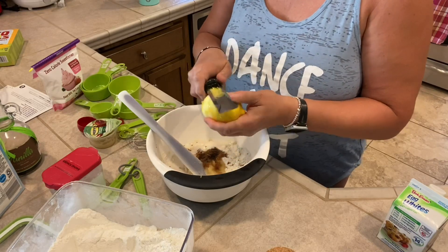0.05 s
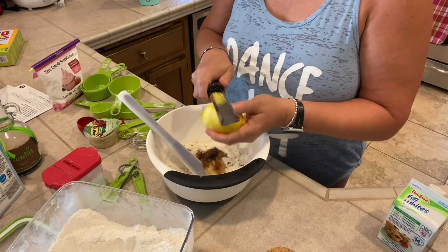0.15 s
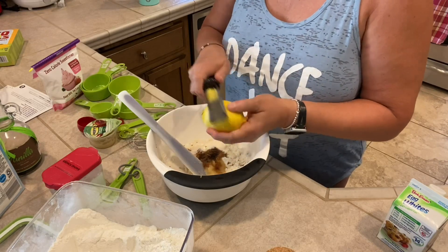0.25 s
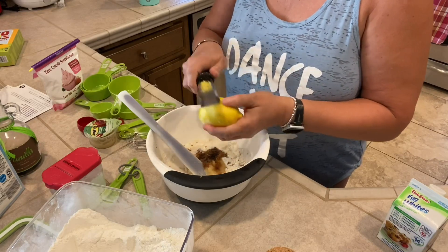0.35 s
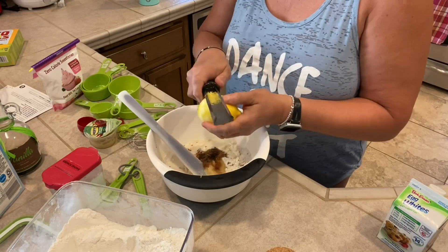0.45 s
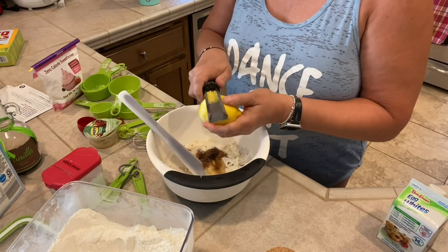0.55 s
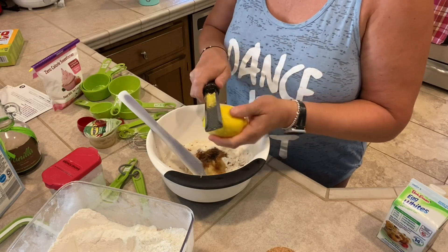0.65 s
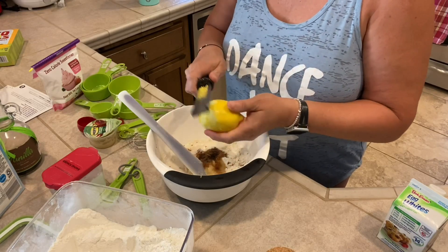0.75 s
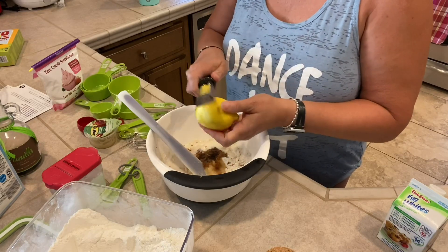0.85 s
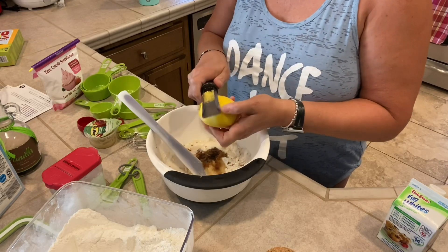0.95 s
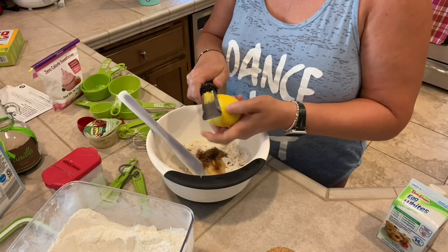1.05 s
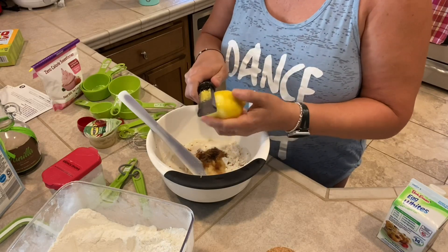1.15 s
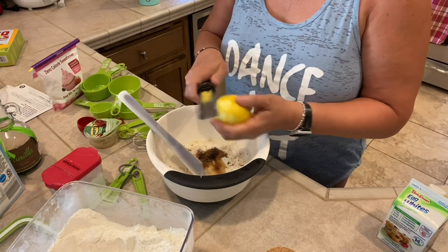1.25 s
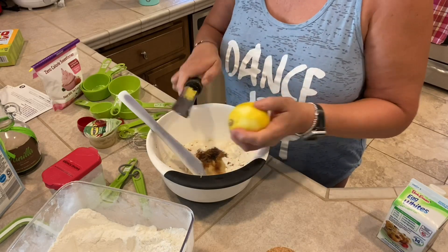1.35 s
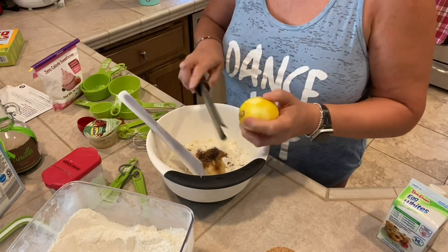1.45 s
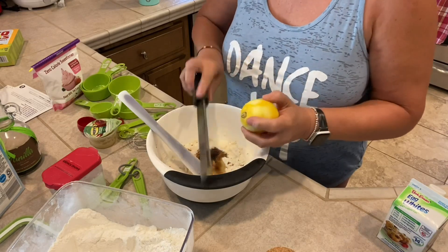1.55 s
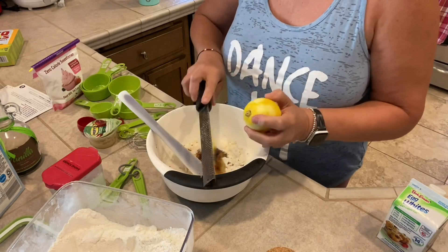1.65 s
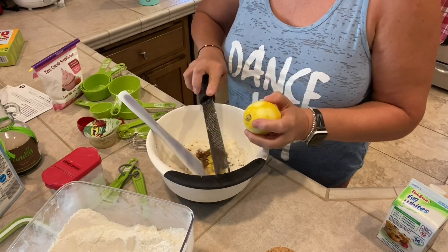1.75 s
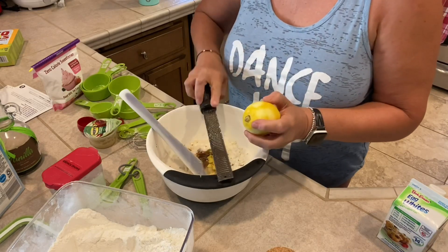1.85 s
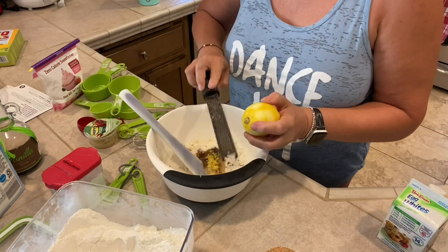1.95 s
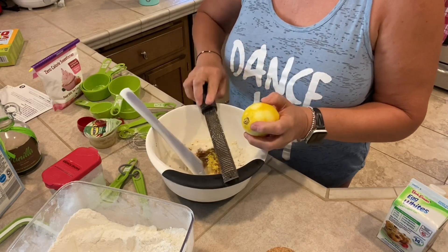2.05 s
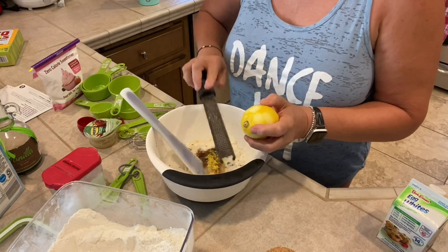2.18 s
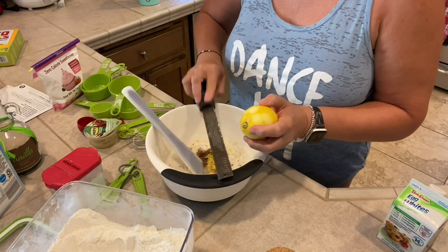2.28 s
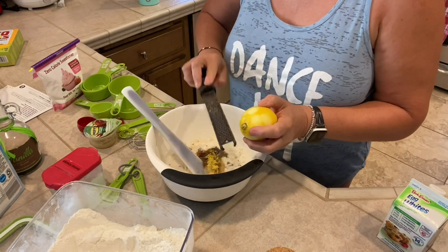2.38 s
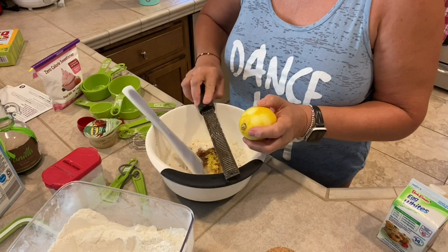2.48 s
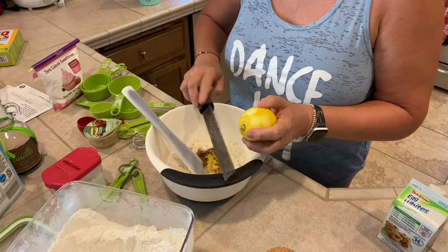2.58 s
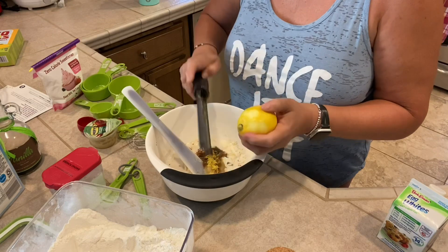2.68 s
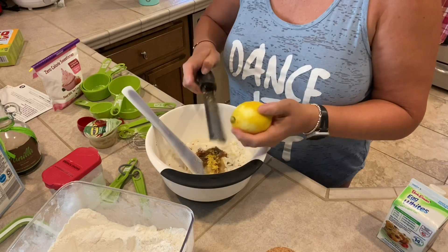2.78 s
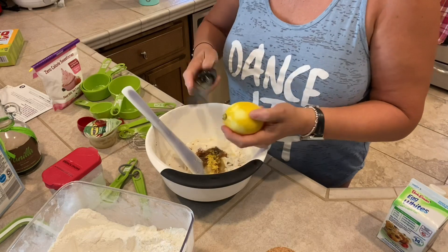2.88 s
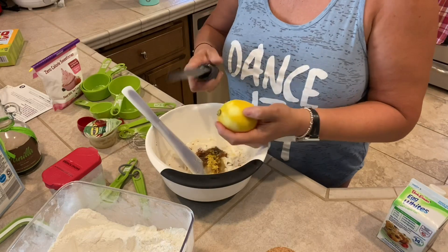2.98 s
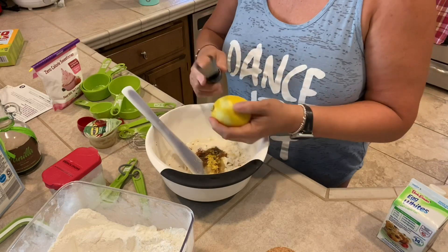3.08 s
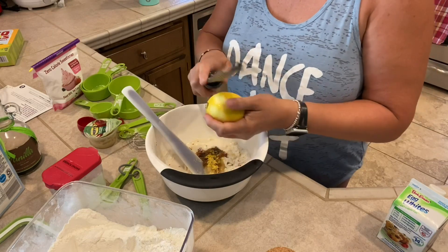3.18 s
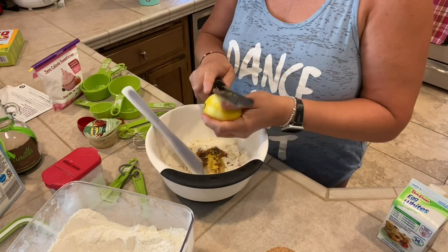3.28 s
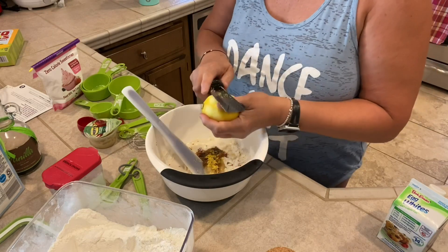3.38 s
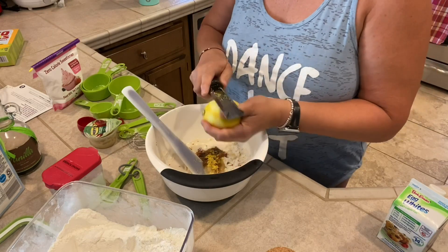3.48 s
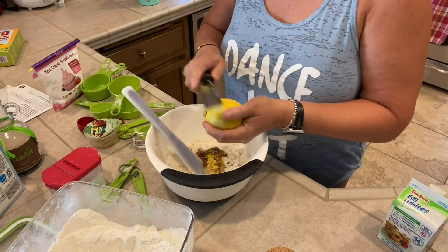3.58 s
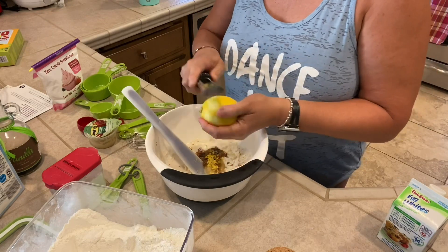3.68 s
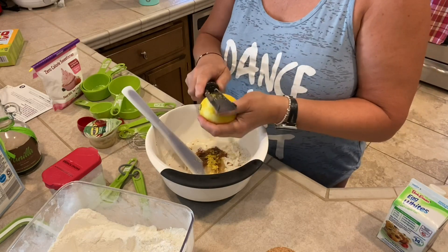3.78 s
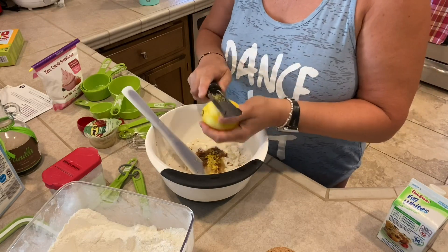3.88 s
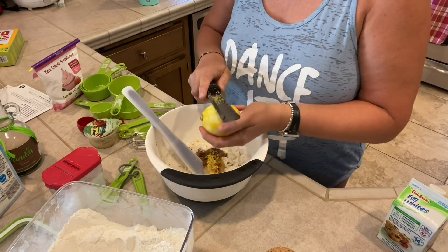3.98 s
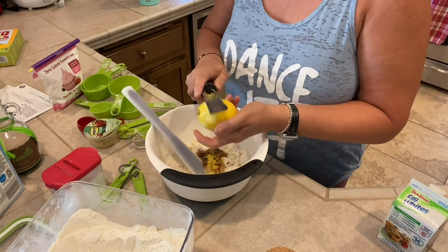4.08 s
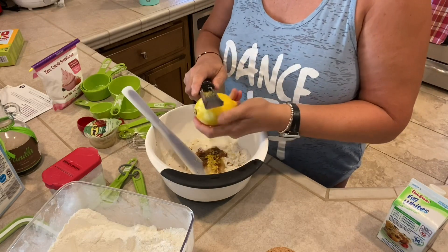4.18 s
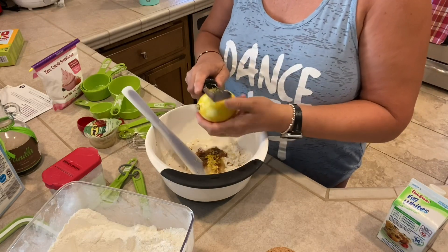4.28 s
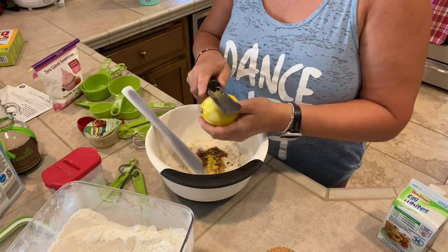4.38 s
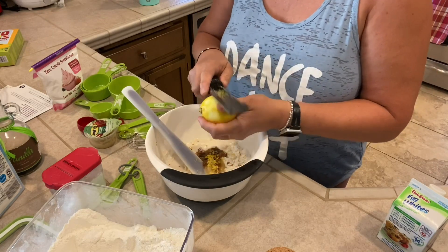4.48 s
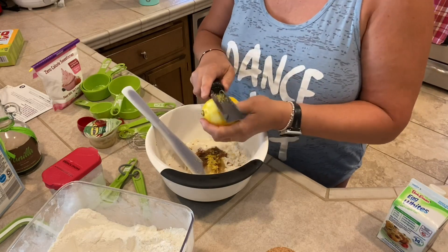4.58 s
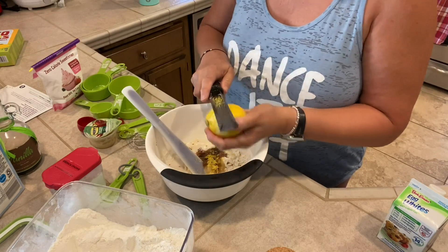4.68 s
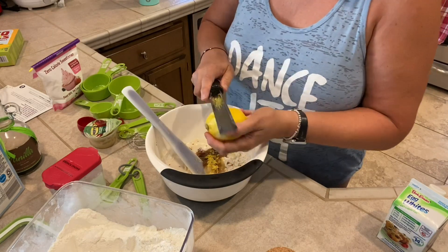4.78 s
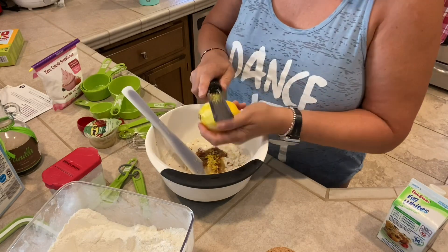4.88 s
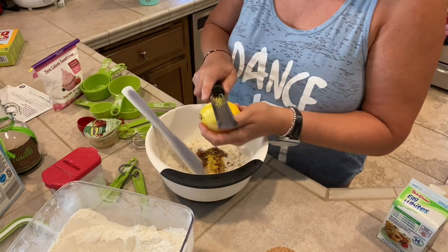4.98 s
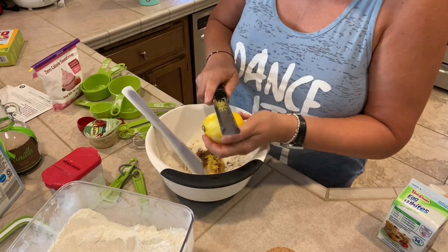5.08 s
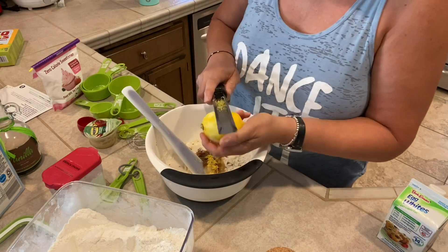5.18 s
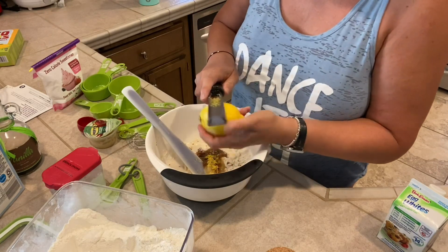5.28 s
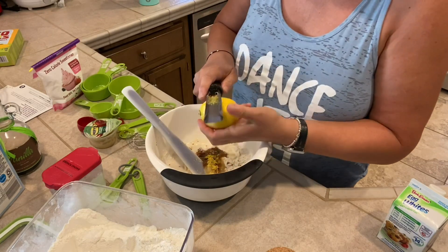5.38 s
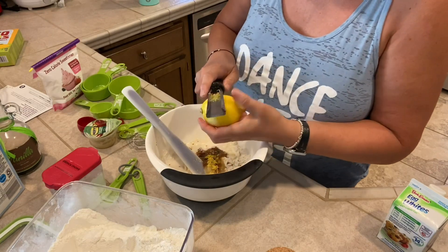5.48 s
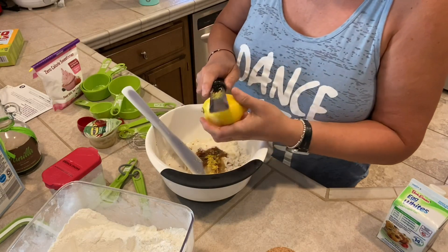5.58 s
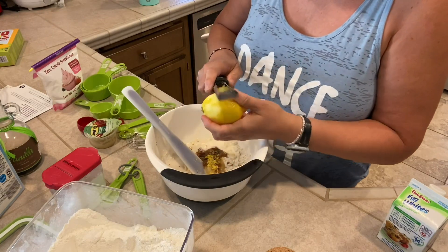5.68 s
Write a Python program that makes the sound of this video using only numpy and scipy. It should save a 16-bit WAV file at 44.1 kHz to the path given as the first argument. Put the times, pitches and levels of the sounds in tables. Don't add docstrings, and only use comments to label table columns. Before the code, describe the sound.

Close stereo pickup in a tiled kitchen: two quiet, gritty rasps of lemon peel on a fine grater, small handling ticks, then five loud knocks of the steel blade against a plastic bowl, hollow and briefly echoing. Fingers rub the fruit, and four more soft scrapes follow over a low refrigerator hum.

```python
import sys
import numpy as np
from scipy import signal
from scipy.fft import rfft, irfft
from scipy.io import wavfile

SR = 44100
rng = np.random.default_rng(int(sys.argv[2]) if len(sys.argv) > 2 else 0)


def store_wav(level_fs):
    pcm = np.round(np.clip(np.atleast_2d(level_fs), -1, 1) * 32767)
    wavfile.write(sys.argv[1], SR, pcm.T.astype(np.int16))


def rack_gain(trim_db):
    fader = np.asarray(trim_db, float)
    return 10 ** (fader / 20)


N = 253414


def rms_one(x):
    return x / np.sqrt(np.mean(x ** 2) + 1e-20)


def at_hz(points, hz):
    points = np.array(points)
    return np.interp(np.log(hz), np.log(points[:, 0]), points[:, 1])


def drift(rate):
    r = np.exp(-80 * np.pi * rate / SR)
    noise = rng.standard_normal(N // 40 + 2002)
    slow = signal.lfilter([1], [1, -2 * r, r * r], noise)[2000:]
    return np.interp(np.arange(N) / 40, np.arange(len(slow)), rms_one(slow))


def peak(x, hz, width):
    r = np.exp(-np.pi * width / SR)
    poles = [1, -2 * r * np.cos(2 * np.pi * hz / SR), r * r]
    return signal.lfilter([(1 - r * r) / 2, 0, (r * r - 1) / 2], poles, x)


def colour(x, spectrum):
    hz = np.maximum(np.fft.rfftfreq(N, 1 / SR), 1)
    return rms_one(irfft(rfft(x) * rack_gain(at_hz(spectrum, hz)), N))


def grains(per_s, spread_db):
    sizes = rack_gain(spread_db * np.minimum(rng.exponential(1, N), 4)) * rng.choice([-1, 1], N)
    return sizes * (rng.random(N) < per_s / SR)


def motion(rows, column, law):
    t, power = np.arange(0, N / SR, .001), 0
    for row in rows:
        turn = np.interp(t, np.cumsum(row[:3]), [0, np.pi / 2, np.pi])
        power = power + (rack_gain(row[column]) * np.abs(np.sin(turn)) ** law) ** 2
    return np.interp(np.arange(N) / SR, t, np.sqrt(power))


# start in seconds, speeding up in seconds, slowing down in seconds,
# cut level in dB at full speed.
STROKES = [
    (-.01, 0.13, 0.076, -54.5),
    (.445, 0.12, 0.11, -51),
    (3.345, 0.079, 0.11, -54.5),
    (3.752, 0.077, .14, -51.5),
    (4.485, 0.14, 0.1, -52),
    (4.915, .1, 0.076, -52),
]
# start in seconds, speeding up in seconds,
# slowing down in seconds, hiss in dB, cut in dB.
GLIDES = [(.384, 0.0047, 0.048, -86.5, -69), (.87, 0.047, 0.12, -80, -74.5),
          (1.14, 0.058, 0.066, -79.5, -71), (1.275, 0.021, 0.019, -61.5, -65), (1.31, .04, 0.08, -75, -77),
          (1.37, .1, 0.14, -73, -81), (2.68, .16, .05, -70.5, -77.5), (2.92, 0.079, .08, -82, -80.5),
          (3.03, 0.059, 0.15, -81, -80.5), (3.5, 0.037, 0.021, -80.5, -73.5),
          (4.055, 0.019, 0.075, -78, -77.5), (4.27, 0.117, .1, -82, -82.5), (4.855, 0.028, .03, -81, -85),
          (5.18, 0.11, 0.051, -71, -69.5), (5.465, 0.0078, 0.027, -85, -97.5),
          (3.22, .012, 0.045, -92.5, -77), (5.48, 0.039, .15, -100, -82.5)]
# start in seconds, speeding up in seconds,
# slowing down in seconds, fingers in dB, palm in dB.
GRIPS = [(.2, 0.064, 0.16, -69, -51.5), (.384, 0.0044, 0.061, -66, -61), (.75, 0.05, 0.28, -97, -62),
         (1.12, 0.082, 0.17, -78, -57.5), (1.45, 0.12, 0.039, -57, -61), (2.95, 0.18, .15, -96, -67),
         (3.54, 0.065, 0.09, -98, -64.5), (4.0, 0.11, .14, -97, -72), (4.28, 0.049, 0.22, -63, -60.5),
         (5.2, 0.11, 0.13, -74, -63), (5.36, 0.15, 0.26, -67, -64)]
# frequency in Hz, density in dB per Hz.
PEEL = [(290, -40.5), (500, -21), (1020, -15.5), (1440, -1.5), (1840, -5.5), (3870, 4), (5770, -6.5),
        (8300, -7), (10800, -25), (18300, -120)]
# frequency in Hz, width in Hz, lift in dB.
BLADE = [(1555, 200, 3.5), (2834, 250, 6), (3500, 500, 3.5), (3740, 210, 2.5), (7960, 610, -3.5)]
# frequency in Hz, density in dB per Hz.
HISS = [(3000, -26.5), (6000, -6), (9000, -2.5), (13000, -4), (16500, -7.5)]
RUB = [(400, -18.5), (800, -2), (1400, 2), (2000, -3), (2600, -4), (3200, -28.5), (8000, -68)]
PALM = [(200, -27.5), (400, 8), (900, -2.5), (1300, -26), (2500, -38.5)]


def zesting():
    cut_gain = motion(STROKES, -1, law=1.57) + motion(GLIDES, -1, law=1.7)
    hiss_gain = rack_gain(-5.5) * motion(STROKES, -1, law=2.2) + motion(GLIDES, -2, law=1.7)
    rub_gain = rack_gain(-0.1) * motion(STROKES, -1, law=2.8) + motion(GRIPS, -2, law=2.4)
    palm_gain = rack_gain(-13) * motion(STROKES, -1, law=1.6) + motion(GRIPS, -1, law=2.4)

    teeth = grains(7000, spread_db=3.5)
    skin = grains(5000, spread_db=2.5)
    uneven = drift(40)
    ringing = sum((rack_gain(db) - 1) * peak(teeth, hz, width) for hz, width, db in BLADE)
    cut = colour(teeth + ringing, PEEL) * cut_gain * rack_gain(-0.5 + 0.37 * uneven)
    hiss = colour(teeth, HISS) * hiss_gain * rack_gain(3.0 + 0.72 * uneven)
    rub = colour(skin, RUB) * rub_gain * rack_gain(-5.5)
    palm = colour(skin, PALM) * palm_gain * rack_gain(-7.5)
    return cut + hiss + rub + palm


# frequency in Hz, density in dB per Hz.
CLATTER = [(150, -23), (500, 0), (1500, -5), (3000, -13.5), (6000, -19.5), (16000, -32.5)]


def struck(hits, modes, late_turns, late_s, held_s, spread_db, crack_s, clatter_s):
    body, cracks, clatters = np.zeros((3, N))
    t = np.arange(5000) / SR
    hz, mode_db, t60 = np.transpose(modes)[:, :, None]
    since = np.maximum(t - late_s - late_turns / hz, 0)
    swell = (1 - np.exp(-since * hz / 0.45)) * rack_gain(-60 * since / t60)
    damped = 1 / (1 + np.exp(np.minimum((t - held_s) / 0.0011, 50)))
    ringing = damped * swell * np.sin(2 * np.pi * hz * since)
    signs = (-1) ** np.arange(len(hz))[:, None]
    crack_fade = np.exp(-t[:3000] / crack_s)
    clatter_shape = (1 - np.exp(-t / 0.00017)) * np.exp(-t / clatter_s)
    rattle = colour(grains(5400, spread_db=7.5), CLATTER)
    for s, db, weight_db, crack_db, clatter_db in hits:
        i = round(s * SR)
        snap = rng.standard_normal(3000)
        uneven_db = spread_db * rng.standard_normal((len(hz), 1))
        tilt_db = -weight_db * np.log2(hz / 500)
        strength = signs * rack_gain(mode_db + tilt_db - 3.5 + uneven_db)
        body[i:i + 5000] += rack_gain(db) * np.sum(strength * ringing, axis=0)
        cracks[i:i + 3000] += rack_gain(db + crack_db) * crack_fade * snap
        clatters[i:i + 5000] += rack_gain(db + clatter_db) * clatter_shape * rattle[i:i + 5000]
    rumble_cut = signal.butter(2, 90, "high", fs=SR, output="sos")
    return signal.sosfilt(rumble_cut, [body, cracks, clatters])


# start in seconds, strength in dB, weight in the lows in dB per octave,
# crack in dB, clatter in dB.
TOUCHES = [
    (1.5295, -9, 9, -27.5, -21.5),
    (1.7695, -12.5, 2, -30.5, -21.5),
    (1.9665, -10.5, -1.5, -32, -13.5),
    (2.190, -11.5, 7.5, -21, -15),
    (2.3985, -8.5, 4, -30.5, -16.5),
]
# frequency in Hz, level in dB, t60 in seconds.
RIM = [(191, -12.5, 0.067), (313, -12.5, 0.027), (447, -11.5, 0.025), (562.7, -3, 0.021),
       (642, -9.5, 0.024), (1148, -1, 0.072), (1204, -12, 0.025), (1759, -15, 0.035), (2360, -13, 0.0087),
       (8750, -33.5, .008)]


def rim_touches():
    return struck(TOUCHES, RIM, late_turns=0.5, late_s=.0012, held_s=0.012, spread_db=4.05,
                  crack_s=.002, clatter_s=0.026)


# start in seconds, strength in dB, weight in the lows in dB per octave,
# crack in dB, clatter in dB.
SLAPS = [
    (1.785, -7.5, 3.5, -8.5, -18),
    (1.9743, -2.5, 3.4, -11.5, -21),
    (2.205, -8.5, 5, -9.5, -30.5),
    (2.4072, -0.5, 2.8, -17, -25.5),
]
# frequency in Hz, level in dB, t60 in seconds.
BOWL = [(147.4, -5, 0.055), (248, -5.5, 0.057), (383.5, -1.5, 0.17), (507, -10, 0.22), (600, -9, 0.048),
        (710, -14, 0.041), (816, -19, 0.056), (941, -15, 0.087), (1090, -14.5, 0.019), (2309, -9.5, 0.0091)]


def bowl_slaps():
    return struck(SLAPS, BOWL, late_turns=0.39, late_s=0.00037, held_s=0.014, spread_db=0.65,
                  crack_s=0.00036, clatter_s=0.014)


# start in seconds, peak in dB, centre in Hz, fade in ms.
TICKS = [(0.3865, -47.5, 1422, 1.9), (.449, -57, 6000, 1.04), (.858, -57.5, 12630, 0.73),
         (.882, -57, 12180, 0.87), (1.186, -59, 3500, 1.7), (1.203, -61, 5200, 1), (1.216, -52, 5100, 1.2),
         (1.276, -61, 12160, 1.4), (1.2927, -45.5, 3020, 1.4), (1.348, -58.5, 9160, 1.2),
         (3.231, -65, 3000, 1.6), (3.536, -56, 11740, 1), (3.724, -62, 3360, 1.4), (3.772, -53, 3620, 1.5),
         (4.066, -61, 3500, 1.36), (4.874, -60, 2020, 1.63)]


def ticks():
    out, t = np.zeros(N), np.arange(500) / SR
    for s, db, hz, fade_ms in TICKS:
        noise = rng.standard_normal(500)
        burst = np.sign(noise) * np.abs(noise) ** .5 * np.exp(-1000 * t / fade_ms)
        i = round(s * SR)
        out[i:i + 500] += rack_gain(db + 8.5) * (0.09 * burst + peak(burst, hz, 1.4 * hz))
    return out


# start in seconds, pitch in Hz, level in dB, t60 in seconds.
COUNTER = [
    (1.551, 162, -38.5, 0.48),
    (1.579, 117, -32, 0.22),
    (1.842, 70, -38.5, 0.24),
    (2.257, 73, -21.5, .15),
    (2.441, 93, -24.5, 0.13),
]


def thuds():
    out = np.zeros(N)
    for s, hz, db, t60 in COUNTER:
        t = np.maximum(np.arange(N) / SR - s, 0)
        swell = 1 - np.exp(-t / 0.0058)
        out += rack_gain(db - 60 * t / t60) * swell * np.sin(2 * np.pi * hz * t)
    return out


def at_ports(x):
    return np.array([np.roll(x, 4), x])


def reflected(x, scatter_db):
    t = np.arange(800) / SR
    delay_s, fade_s = .0005, .004
    smear = rng.standard_normal((2, 800)) * np.exp(-t / fade_s) * (t > delay_s)
    smear = rack_gain(scatter_db) * smear / np.sqrt(np.sum(smear ** 2, axis=1)[:, None])
    return at_ports(x) + signal.oaconvolve(x[None], smear, axes=1)[:, :N]


# frequency in Hz, likeness from -1 to 1.
LIKENESS = [(60, 0.86), (180, 0.8), (550, -0.12), (1650, -0.17), (4970, 0.071), (15000, 0.34)]


def diffuse(count):
    hz = np.maximum(np.fft.rfftfreq(count, 1 / SR), 1)
    mid, side = rfft(rng.standard_normal((2, count)))
    alike = np.clip(at_hz(LIKENESS, hz), -1, 1)
    pair = np.sqrt(1 + alike) * mid + np.sqrt(1 - alike) * side * [[1], [-1]]
    return hz, pair / np.sqrt(2)


# frequency in Hz, t60 in seconds.
KITCHEN = [(60, 0.62), (250, 0.41), (700, 0.51), (2000, 0.58), (5000, 0.53), (12000, 0.24)]
# frequency in Hz, reflected level in dB.
WALLS = [(60, -2.5), (250, -3.5), (640, 0.5), (1050, -6), (1900, 0.5), (5000, -4.5), (12000, 1),
         (16000, -14)]
# frequency in Hz, width in Hz, lift in dB.
CUPBOARD = [(361.4, 8.1, 6), (526, 2.4, 3), (598.3, 17, 6.5), (723.4, 35, 13.5), (1196, 11, -4.5)]


def kitchen(x, wet_db):
    hz, pair = diffuse(count=SR)
    t, echo = np.arange(SR) / SR, 0
    for centre in 40 * 2 ** np.arange(0, 9, .5):
        share = np.clip(1 - 2 * np.abs(np.log2(hz / centre)), 0, 1)
        t60 = at_hz(KITCHEN, centre)
        fade = rack_gain(at_hz(WALLS, centre) - 60 * t / t60)
        echo = echo + irfft(pair * share, SR) * fade / np.sqrt(t60 * SR / 14)
    echo = echo * np.clip((t - .004) / 0.011, 0, 1)
    x = x + sum((rack_gain(db) - 1) * peak(x, mode_hz, width) for mode_hz, width, db in CUPBOARD)
    return rack_gain(wet_db) * signal.fftconvolve(x[None], echo, axes=1)[:, :N]


# frequency in Hz, density in dB per Hz.
AIR = [(15, -45.5), (33, -32.5), (48, -6), (62, 2.5), (85, -20.5), (108, -3.5), (149, -16.5), (206, -16.5),
       (236, -19), (301, -14.5), (850, -34.5), (1600, -50), (7710, -59), (12500, -60), (16000, -75.5)]
# frequency in Hz, width in Hz, level in dB.
HUM = [(51.6, 13, -55.5), (63, 19, -54), (119.8, 14, -56.5), (295.7, 6.6, -67)]


def background():
    hz, pair = diffuse(count=N)
    air = rack_gain(-50 + 1.7 * drift(2)) * rms_one(irfft(pair * rack_gain(at_hz(AIR, hz)), N))
    noise = rng.standard_normal(N)
    hum = sum(rack_gain(db) * rms_one(peak(peak(noise, hum_hz, width), hum_hz, width)) for hum_hz, width, db in HUM)
    motor_line = np.sin(2 * np.pi * 298 * np.arange(N) / SR + 1.5 * drift(1.7))
    hum = hum + rack_gain(-62.5) * motor_line
    return air + hum * rack_gain([[.4], [-.4]])


def scene():
    body, crack, clatter = rim_touches() - bowl_slaps()
    scrape, small = zesting(), ticks()
    crack = crack + rack_gain(12) * peak(crack, 1500, 1400) + rack_gain(6) * peak(crack, 3800, 2500)
    knocks = at_ports(body) + reflected(crack, scatter_db=-9) + reflected(clatter, scatter_db=-4)
    hands = reflected(scrape, scatter_db=0.5) + reflected(small, scatter_db=-7.0)
    direct = knocks * rack_gain([[-.6], [.6]]) + hands * rack_gain([[.3], [-.3]])
    to_room = body + clatter + rack_gain(-18) * crack + rack_gain(-0.5) * (scrape + small)
    return direct + thuds() + kitchen(to_room, wet_db=-3.0) + background()


def band_limit(x):
    return signal.sosfilt(signal.butter(12, 16630, fs=SR, output="sos"), x)


def record(dry):
    mid, side = (dry[0] + dry[1]) / 2, (dry[0] - dry[1]) / 2
    for band_hz in [(8250, 10100), (13600, 15400), (15700, 17500)]:
        mid = signal.sosfilt(signal.butter(3, band_hz, "bandstop", fs=SR, output="sos"), mid)
    side = signal.sosfilt(signal.butter(3, [10900, 12500], "bandstop", fs=SR, output="sos"), side)
    mid = mid - .3 * peak(mid, 15550, 900)
    pair = np.array([mid + side, mid - side])
    rounded = 1.15 * np.tanh(pair / 1.15)
    return band_limit(rounded)


dry = scene()
out = record(dry)
store_wav(out)
```